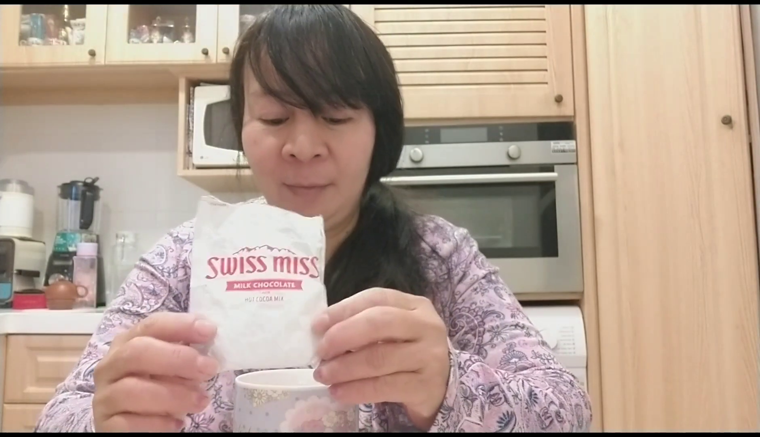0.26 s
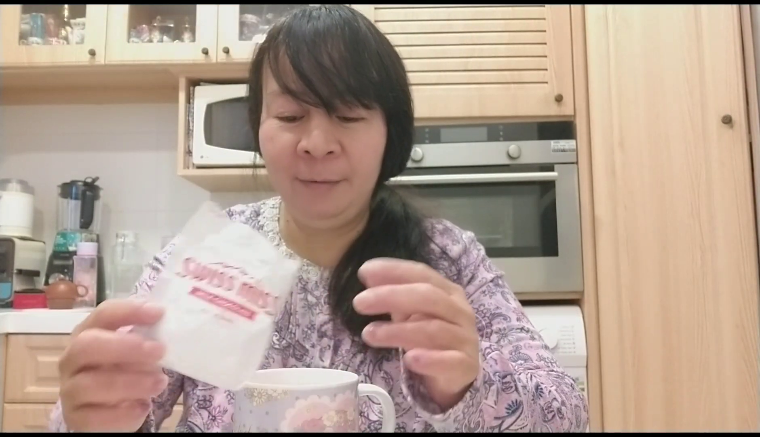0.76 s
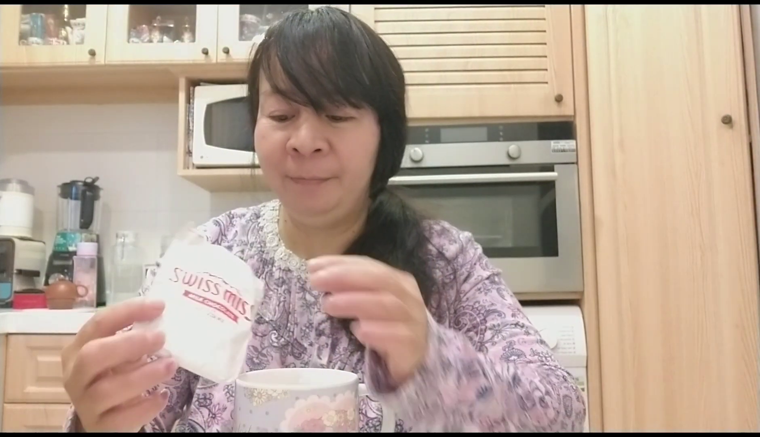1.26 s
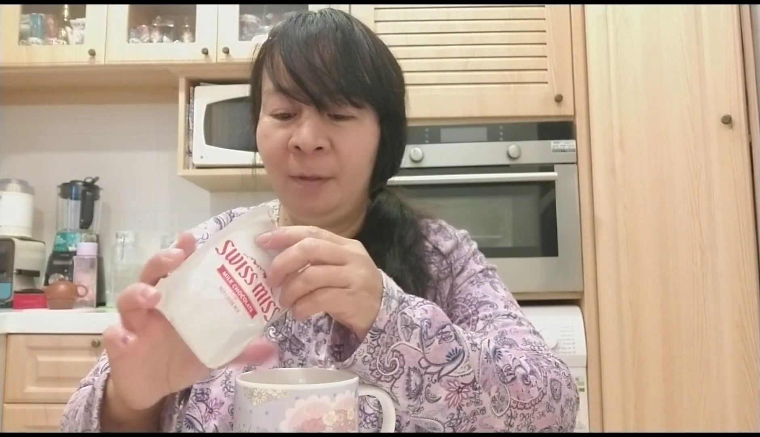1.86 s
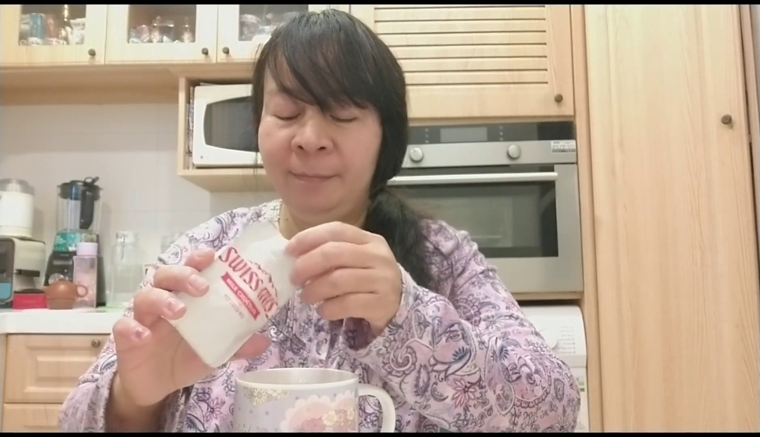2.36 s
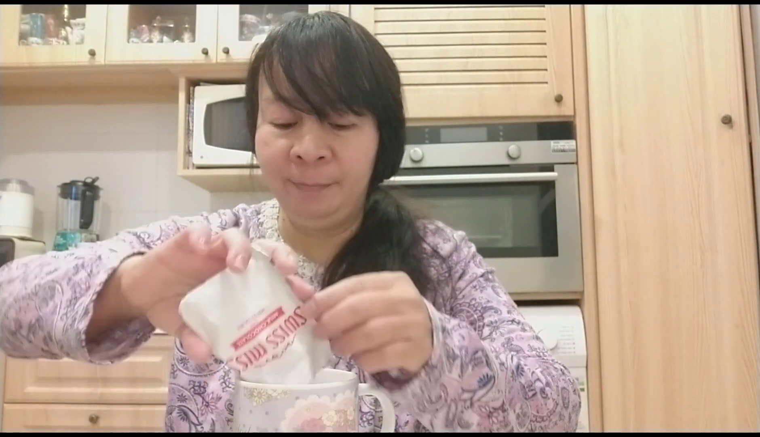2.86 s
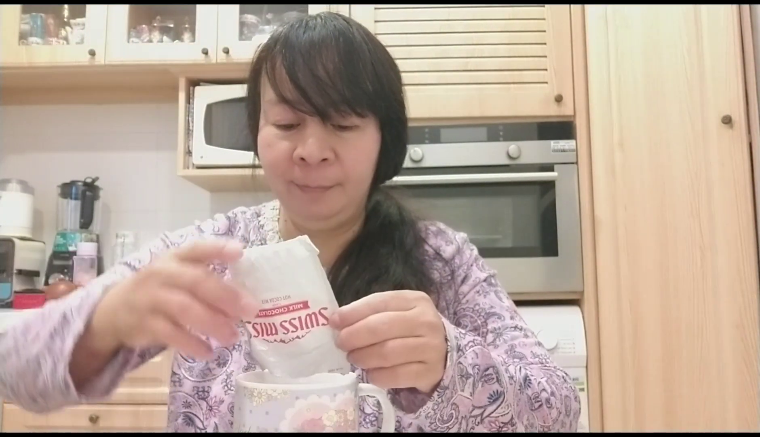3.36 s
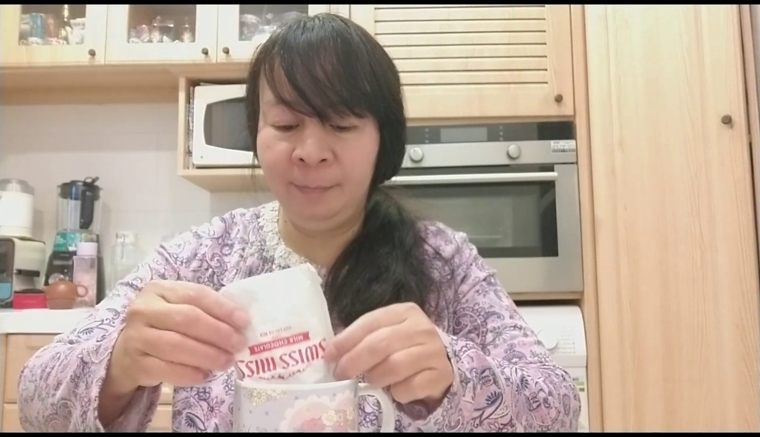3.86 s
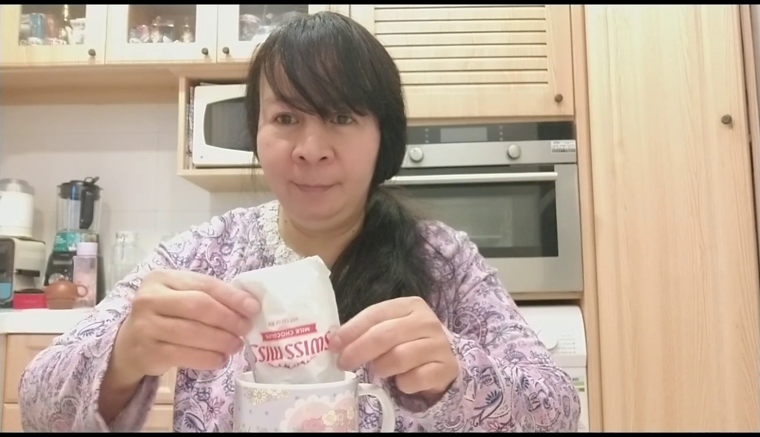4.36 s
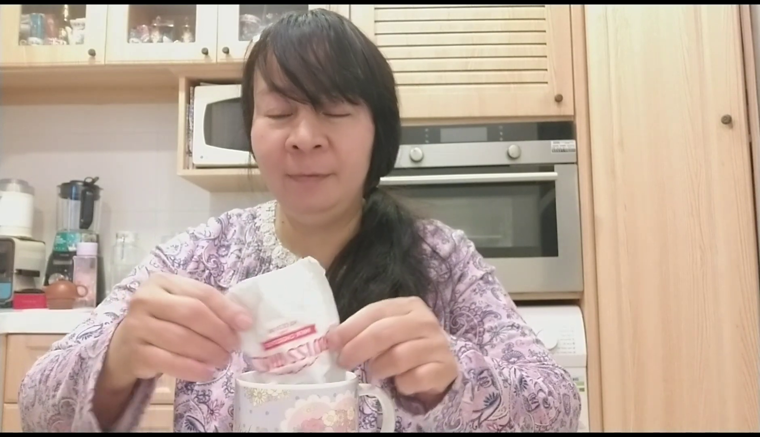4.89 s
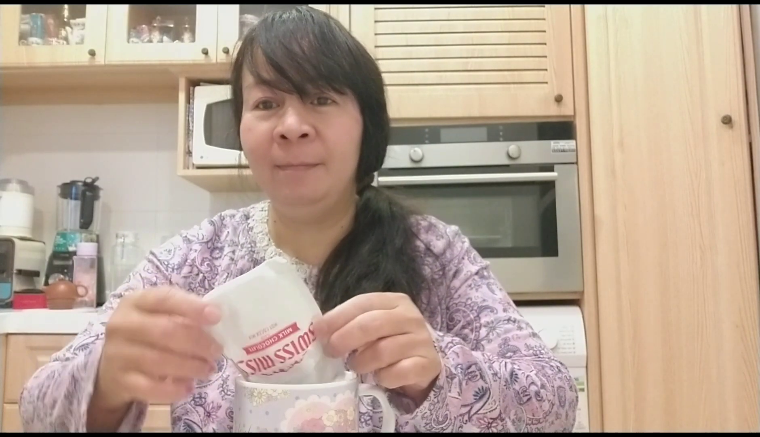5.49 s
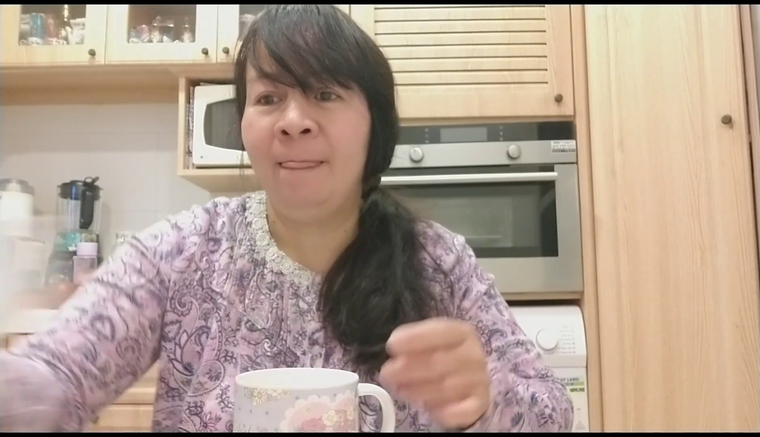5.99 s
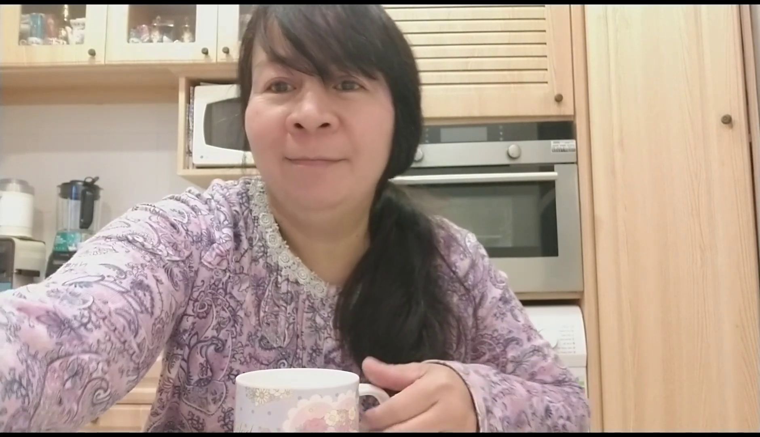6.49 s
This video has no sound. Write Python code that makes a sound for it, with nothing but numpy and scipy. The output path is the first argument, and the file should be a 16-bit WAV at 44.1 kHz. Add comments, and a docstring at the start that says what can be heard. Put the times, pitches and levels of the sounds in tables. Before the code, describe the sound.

A steady, faint appliance whirr and low hum fill a small kitchen, recorded close in stereo. From 0 to 0.7 s fingers rub a taut paper sachet with thin crinkles and tiny snaps. At 0.87 s one abrupt, loud pressure pop hits the left side. After near quiet, soft paper rustles begin around 1.5 s; rougher fibrous rips come at 2.3 s and from 2.75 to 3.1 s, with a few taps. At about 3.45 s crisp cracks begin, and at 3.64 s powder rushes out, fading within fractions of a second. Until 5.6 s irregular finger taps ring short and hollow in the mug, with grainy trickles, dry crease ticks and muted table bumps. A sleeve swishes around 5.8 and 6.1 s, brushing by at 6.3 s. From 6.4 to 6.6 s something hard is knocked down close on the right: a very loud click, then duller bouncing clacks and woody thumps, ending in low rumble.

```python
"""A paper sachet is handled at a kitchen table, torn open and tipped into a mug: shaped noise gives its friction.
The powder slides out in decaying rushes, and finger taps shake out the rest, each ringing a mode of the mug's air.
Early on a puff pops in the left microphone port, as one pressure jump. Near the end a sleeve swishes past in
swells of noise and something is knocked down close to the right port, as impulses with damped modes.
Soft bumps and rumble of the table and steady appliance noise lie underneath."""
import sys
import numpy as np
from scipy import signal
from scipy.fft import rfft, irfft, next_fast_len
from scipy.io import wavfile
from scipy.ndimage import uniform_filter1d, map_coordinates

SR = 44100
rng = np.random.default_rng(int(sys.argv[2]) if len(sys.argv) > 2 else 0)


def unload_audio(sound):
    """Save the sound as a 16-bit wav file, at the path given as the first command line argument."""
    columns = np.transpose(np.atleast_2d(sound))
    # keep every value between -1 and 1, then stretch to whole-number steps
    steps = np.round(np.clip(columns, -1, 1) * 32767)
    wavfile.write(sys.argv[1], SR, steps.astype(np.int16))


N = 297168  # samples
TIME = np.arange(N) / SR  # seconds
AGE = np.arange(SR // 2) / SR  # seconds since a blow

# Levels in the event tables are relative: each source applies its own gains to them.
# Fingers rub the sealed pouch while turning it. Each row: start in seconds, length in seconds, level in dB.
RUBS = [(-0.03, 0.06, -57), (.10, 0.087, -63.5), (.192, .048, -50.5), (.305, 0.1, -53), (.476, 0.03, -48.5),
        (.6, 0.13, -65.5)]
# Pulls that tear the top off and turn the pouch over. Each row: start in seconds, length in seconds, level in dB,
# share of ripping fibres in the power (0-1).
PULLS = [(1.541, 0.024, -66, .05), (1.566, 0.081, -54, 0), (1.68, 0.038, -56.5, 0.08),
         (1.806, 0.12, -64.5, 0), (1.904, 0.1, -58.5, 0), (2.23, 0.14, -73, 0.33),
         (2.329, 0.11, -51.5, 0.6), (2.75, 0.099, -59, 0.46), (2.845, 0.052, -55, 0.15),
         (2.884, 0.031, -47, 0.24), (2.953, 0.031, -47, 0.26), (3.04, 0.058, -49, 0.9),
         (3.213, 0.017, -52.5, 0), (3.33, 0.099, -68, 0)]
# Hollow murmur of the pouch while fingers work it. Each row: start in seconds, length in seconds, level in dB.
HELD = [(1.47, 4.15, -66)]
# Shakes that send powder trickling over the paper. Each row: start in seconds, length in seconds, level in dB.
SHAKES = [(3.402, 0.014, -45), (3.645, 0.036, -41.5), (3.765, 0.064, -56.5), (3.993, 0.027, -48),
          (4.03, 0.053, -52.5), (4.17, 0.14, -69), (4.34, 0.036, -67.5), (4.485, 0.14, -72),
          (4.603, .018, -56), (4.682, .03, -50), (4.852, 0.024, -55), (5.008, 0.1, -53),
          (5.158, 0.037, -49.5), (5.25, .17, -55), (5.495, 0.095, -49)]
# Powder sliding out. Each row: start in seconds, level in dB, t60 in seconds.
SLIDES = [(3.069, -50, 0.24), (3.61, -44, 0.7), (3.642, -30, 0.24), (3.762, -44.5, 0.36)]
# Taps and falling clumps. Each row: time in seconds, level in dB, mug air mode in Hz,
# paper crack in dB relative to that level.
TAPS = [(0.3865, -47, 548, 11), (2.348, -44, 900, 20), (2.851, -38.5, 790, -3), (2.863, -41, 794, 8),
        (2.981, -29.5, 740, 7.5), (3.45, -30, 826, 3.5), (3.609, -33, 860, 10), (3.654, -27, 800, 13),
        (3.771, -27, 780, 3), (3.825, -28, 740, 9), (3.838, -26, 854, 10.5), (3.856, -24, 803, 2.5),
        (3.874, -33, 770, 1), (4.051, -33, 773, -5), (4.136, -35.5, 793, -12), (4.166, -22.5, 837, -4.5),
        (4.254, -32, 717, 2.5), (4.56, -30, 680, -8), (4.61, -20.5, 810, 1), (4.795, -29.5, 764, -6),
        (4.87, -37.5, 770, -3), (5.009, -24.5, 850, 2), (5.09, -24, 773, -2), (5.184, -36, 800, 6),
        (5.249, -28, 770, -2.5), (5.538, -30, 863, -7), (5.617, -40, 860, 1)]
# The pouch empties between these two times, in seconds.
POUR_S = [3.7, 4.7]
# Ring of the mug in dB relative to the tap: pouch full, pouch emptied.
MUG_RING_DB = [7.5, 3]
# Creases snapping. Each row: time in seconds, level in dB.
SNAPS = [(0.0953, -34), (0.3867, -40), (0.5065, -39), (0.646, -47), (1.582, -56), (1.965, -41),
         (2.345, -52), (3.226, -39), (3.4507, -25.5), (3.641, -22), (3.771, -25.5), (3.811, -32.5),
         (3.982, -37.5), (3.9997, -30.5), (4.575, -32.5), (4.6947, -40), (5.0392, -29), (5.1635, -28.5),
         (5.6147, -27.5)]
# Sweeps of the reaching arm. Each row: middle in seconds, half length in seconds, level in dB.
SWEEPS = [(5.81, 0.14, -53.5), (6.12, 0.092, -52.5), (6.34, 0.14, -60)]
# Knocks by the right port. Each row: time in seconds, click in dB, table boom in dB, table knock in dB,
# dullness (0-1).
KNOCKS = [(6.409, -27.5, -52, -39, 0), (6.4359, -4, -31, -25, 0.18), (6.4594, -31, -38, -42, 0.9),
          (6.4885, -10, -31, -40, 0.27), (6.5262, -9.5, -25, -28.5, 0.6), (6.5523, -17.5, -35, -43, 0.73),
          (6.581, -20, -35.5, -38, 0.78)]
# Modes of the table top. Each row: frequency in Hz, mean level in dB, t60 in seconds.
TABLE_MODES = [(257.3, -11.5, 0.18), (356, -10, 0.08), (432, -1, 0.063), (477, -6, 0.085),
               (577, -11, 0.072), (967, 2.5, 0.034)]
# Modes of the hard thing that is knocked. Each row: frequency in Hz, mean level in dB, t60 in seconds.
CLACK_MODES = [(1280, -16, 0.02), (1490, -4, 0.022), (1640, -5, 0.034), (1810, -9, 0.026),
               (2853, 2.5, 0.021), (3230, -10, 0.02), (4140, -2, 0.038)]
# Hands and forearms bumping the table. Each row: time in seconds, level in dB, pitch in Hz.
BUMPS = [(0.385, -40.5, 340), (1.075, -52.5, 128), (1.591, -38.5, 465), (2.306, -45.5, 460),
         (3.452, -39, 128), (3.858, -30, 345), (4.168, -37.5, 400), (4.754, -37, 356), (5.093, -32, 406),
         (5.54, -43.5, 322)]
# The arms press on the table. Each row: middle in seconds, half length in seconds, level in dB.
PRESSES = [(3.95, 0.19, -57), (4.78, 0.24, -61.5), (6.7, 0.53, -70)]
# Hum of the appliances. Each row: frequency in Hz, level in dB.
HUM = [(118.4, -72), (279.9, -74.5), (446.8, -74), (834.4, -82.5)]
# Decay of the kitchen. Each row: frequency in Hz, t60 in seconds.
KITCHEN = [(120, 0.63), (500, 0.37), (1500, 0.33), (5000, 0.37), (14000, 0.27)]

# Relative spectra. Each row: frequency in Hz, level in dB per Hz.
# The sealed, taut pouch; torn paper and the sleeve's brush; ripping fibres; the hollow answer of pouch and mug.
TAUT = [(500, -29), (1500, -12), (2150, -8.5), (2450, 3.5), (2700, -10), (2950, 1), (3250, -8),
        (3500, -1.5), (4200, -8), (6700, -12), (7600, -18.5), (10000, -20), (13000, -18.5), (16000, -25)]
PAPER = [(500, -16), (1100, -14), (1500, -3.5), (1850, -7), (2200, -1.5), (2700, 2), (4200, 4.5),
         (5700, -3), (6700, -1), (7600, -10.5), (10000, -10.5), (13000, -9.5), (16000, -17)]
FIBRES = [(300, -14), (1100, 3), (1500, 0.5), (2500, 0.5), (4000, -10.5), (6700, -14.5), (7600, -17),
          (13000, -15), (16000, -21)]
HOLLOW = [(120, -24), (300, -8.5), (480, -1.5), (620, -4.5), (720, -6), (840, 0), (1020, -9.5),
          (1400, -25.5), (2500, -38.5)]
# Trickling powder and crease ticks; sliding powder; the paper crack of a tap.
POWDER = [(300, -7.5), (1200, 0.5), (1900, -2), (3000, 3), (4300, 1.5), (5500, -3.5), (6700, -4.5),
          (7700, -14.5), (10000, -15.5), (13000, -14.5), (16000, -32)]
RUSH = [(30, -61), (150, 5), (500, 0.5), (820, 14.5), (1200, -16), (1550, 1), (1900, 7.5), (2600, 8),
        (4300, 1.5), (5500, -9), (6700, -4.5), (8000, -16), (12000, -34), (16000, -41.5)]
CRACK = [(60, -46), (300, -15), (1200, -3.5), (1900, -4), (2400, -1.5), (3100, -3), (4000, -6), (5300, -18),
         (6700, -13.5), (7700, -36), (13000, -34), (16000, -22)]
# The sleeve; the click of a knock; the scatter of the wood.
CLOTH = [(150, -6.5), (450, 2.5), (1000, -1.5), (1600, -4), (2900, 1.5), (5000, -3), (6700, -4.5),
         (7600, -11.5), (13000, -11.5), (16000, -12.5)]
CLICK = [(40, -35), (300, 2.5), (750, -4), (1200, -8), (1600, 4), (2000, 1.5), (2400, -4), (3200, -3.5),
         (5000, -2.5), (6600, -9.5), (7600, -13.5), (9000, -8), (12500, -5.5), (16000, -16)]
WOOD = [(30, -40), (130, -2), (220, 6.5), (330, -6), (450, 1.5), (680, -18), (960, 3.5), (1150, -10.5),
        (1700, -5), (3000, -25), (8000, -56)]
# The table under the arms; the whirr of the quiet room.
RUMBLE = [(20, -27), (50, -29), (72, 3.5), (95, -8.5), (140, -12.5), (300, -44.5), (1000, -70)]
QUIET = [(20, -11.5), (48, -39), (70, 6.5), (100, -10), (135, 1), (200, -3), (290, -10), (360, -7),
         (450, -10.5), (600, -12.5), (1050, -15.5), (1600, -26.5), (6500, -33), (15000, -33)]

RUB_ATTACK_S, PULL_ATTACK_S, SHAKE_ATTACK_S = 0.018, 0.013, 0.012
STOP_T60_S, RELEASE_T60_S = 0.055, 0.44  # after a stroke: the direct sound stops, the room carries on
DIRECT_SHARE = 0.33  # of a stroke's power
RUB_BODY_DB, PULL_BODY_DB, SHAKE_AIR_DB = -9.5, -5.5, -5  # the hollow answer, relative to the stroke
STIR_DB, STIR_S = -22.5, 0.016  # air stirred by a tap: level relative to the tap, and how long it is fed
FLAP_DB = 11.5  # the pouch's flap, relative to the tap
RESTING_DB = -67.5  # rumble under the resting arms
TOP_HZ = 15700  # band limit of the recorder


def amp(db):
    """Level: decibels to amplitude gain."""
    return 10 ** (np.asarray(db) / 20)


def unit(x):
    """Normalisation: scale to rms 1."""
    return x / np.sqrt(np.mean(x ** 2) + 1e-20)


def along(points, hz):
    """Interpolation of (Hz, value) points on a logarithmic frequency axis."""
    f, v = np.transpose(points)
    return np.interp(np.log(hz + 1), np.log(f + 1), v)


def colour(x, spectrum):
    """Minimum-phase filtering: folding the cepstrum makes a (Hz, dB) shape causal."""
    n = x.shape[-1]
    m = 2 * next_fast_len(n // 2 + SR // 8)
    log_gain = np.log(amp(along(spectrum, np.fft.rfftfreq(m, 1 / SR))))
    cepstrum = irfft(log_gain, m)
    cepstrum[1:m // 2] *= 2
    cepstrum[m // 2 + 1:] = 0
    response = np.exp(rfft(cepstrum))
    return irfft(rfft(x, m) * response, m)[..., :n]


def wobble(rate):
    """Slow fluctuation: a smooth random curve, rate knots a second."""
    knots = rng.standard_normal(int(N * rate / SR) + 4)
    return map_coordinates(knots, [TIME * rate], order=2)


def fade(t60):
    """Exponential decay: 60 dB down in t60 seconds after a blow."""
    return np.exp(-np.log(1000) * AGE / max(t60, 1e-4))


def ring(hz, t60, attack):
    """Damped resonance: one decaying mode with a soft start."""
    return np.sin(2 * np.pi * hz * AGE) * fade(t60) * (1 - np.exp(-AGE / attack))


def burst(spectrum, t60, sharp=0):
    """Impact noise: an impulse and the scatter after it, coloured and scaled to unit energy."""
    scatter = rng.standard_normal(len(AGE)) * fade(t60)
    impulse = sharp * (AGE == 0)
    x = colour(scatter / np.linalg.norm(scatter) + impulse, spectrum)
    return x / np.linalg.norm(x)


def texture(spectrum, rate, grain_db, spread, flex_db=1):
    """Friction: tiny slips in a blur of finer ones, with shifting resonances, in stereo at rms 1."""
    slips = (rng.random(N) < rate / SR) * rng.standard_normal(N)
    mid = rng.standard_normal(N) + amp(grain_db) * unit(slips)
    side = spread * rng.standard_normal(N)
    z = signal.stft(np.array([mid + side, mid - side]), nperseg=512)[2]
    # the resonances drift over frequency and time as the surface flexes
    field = uniform_filter1d(rng.standard_normal(z.shape[1:]), size=3, axis=0)
    field = uniform_filter1d(field, size=12, axis=1)
    flexed = signal.istft(z * amp(flex_db * unit(field)), nperseg=512)[1][:, :N]
    return unit(colour(flexed, spectrum))


def strokes(rows, attack):
    """Envelope of friction: each stroke rises, holds, stops and lingers in the room; powers add."""
    power, direct = np.zeros(N), np.clip(DIRECT_SHARE, 0, 1)
    for s, length, db in rows:
        rise = np.clip((TIME - s) / attack, 0, 1)
        after = 2 * np.log(1000) * np.maximum(TIME - s - length, 0)  # doubled, as this is power
        stop = direct * np.exp(-after / STOP_T60_S)
        linger = (1 - direct) * np.exp(-after / RELEASE_T60_S)
        power += (amp(db) * rise) ** 2 * (stop + linger)
    return np.sqrt(power)


def swells(rows):
    """Envelope of slow arm movements: each gathers speed and slows again in a bell; powers add."""
    return np.sqrt(sum(amp(db) ** 2 * np.exp(-((TIME - s) / half) ** 2) for s, half, db in rows))


def pan(right_db):
    """Level difference between the two ports: gains with the right one right_db higher."""
    return amp([[-right_db / 2], [right_db / 2]])


def ports(x, right_db, lag):
    """Time and level difference: a mono sound reaches the left port lag seconds later."""
    left = np.interp(AGE - lag, AGE, x, left=0)
    return np.array([left, x]) * pan(right_db)


def room(x, wet_db):
    """Reverberation: a blow convolved with decaying noise, different at each port."""
    hz, t, z = signal.stft(rng.standard_normal((2, len(AGE))), SR, nperseg=256)
    decay = np.exp(-np.log(1000) * t / along(KITCHEN, hz)[:, None])
    tail = signal.istft(z * decay, SR, nperseg=256)[1]
    tail = tail[:, :len(AGE)] * (1 - np.exp(-AGE / 0.0021))
    tail = tail / np.linalg.norm(tail[0])
    return amp(wet_db) * signal.fftconvolve(x[None], tail, axes=1)[:, :len(AGE)]


def add(out, s, x):
    """Superposition: mix a sound in at time s."""
    i = round(s * SR)
    out[:, i:i + x.shape[-1]] += x[..., :N - i]


def handling():
    """Friction and tearing: fingers rub the taut pouch, then rip it in pulls; its hollow body answers."""
    rub = strokes(RUBS, RUB_ATTACK_S)
    pull_rows = [(s, length, db) for s, length, db, share in PULLS]
    rip_rows = [(s, length, db + 10 * np.log10(np.clip(share, 1e-3, 1))) for s, length, db, share in PULLS]
    pull = strokes(pull_rows, PULL_ATTACK_S)
    rip = strokes(rip_rows, PULL_ATTACK_S)
    rustle = np.sqrt(np.abs(pull ** 2 - rip ** 2))  # the power that is not ripping
    rubbing = rub * texture(TAUT, rate=240, grain_db=-13.0, spread=0.84, flex_db=4.0)
    tearing = rustle * texture(PAPER, rate=260, grain_db=-10, spread=0.89, flex_db=3.0)
    ripping = rip * texture(FIBRES, rate=300, grain_db=-6, spread=1.0, flex_db=4)
    answer = rub * amp(RUB_BODY_DB) + pull * amp(PULL_BODY_DB)
    body = np.hypot(answer, strokes(HELD, PULL_ATTACK_S))
    pouch = body * texture(HOLLOW, rate=170, grain_db=-9, spread=0.73, flex_db=6.5)
    grip = amp(0.37 * wobble(54))
    return grip * (rubbing * pan(0.32) + (tearing + ripping) * pan(1.6) + pouch * pan(5.3))


def shaking():
    """Granular friction: powder trickles over the paper; shakes and taps stir the air in the mug."""
    trickle = strokes(SHAKES, SHAKE_ATTACK_S)
    stir = strokes([(s, STIR_S, db + STIR_DB) for s, db, *_ in TAPS], STIR_S)
    grains = trickle * texture(POWDER, rate=280, grain_db=-7.5, spread=1.0, flex_db=4.0)
    air = np.hypot(trickle * amp(SHAKE_AIR_DB), stir)
    mug = air * texture(HOLLOW, rate=120, grain_db=-7.5, spread=0.7, flex_db=5.5)
    return amp(0.29 * wobble(60)) * (grains + mug) * pan(1.7)


def slides():
    """Granular avalanche: masses of powder break loose at once and thin out, landing in clumps."""
    flow = np.zeros((1, N))
    for s, db, t60 in SLIDES:
        front = amp(8.5) * fade(0.0046)  # the front of the mass lands hardest
        add(flow, s, amp(db) * (fade(t60) + front))
    clumps = amp(1.1 * wobble(190))
    return flow * clumps * texture(RUSH, rate=1400, grain_db=-13, spread=0.7, flex_db=2.0) * pan(2.1)


def taps():
    """Cavity resonance: a tap flaps and cracks the pouch and rings the half-covered mug, less once it is empty."""
    out = np.zeros((2, N))
    for s, db, mug_hz, crack_db in TAPS:
        flap = amp(FLAP_DB) * ring(610 * amp(rng.normal(0, 0.8)), t60=.011, attack=0.0027)
        air = amp(np.interp(s, POUR_S, MUG_RING_DB)) * ring(mug_hz, t60=0.025, attack=0.0021)
        knock = amp(db) * (flap + air)
        crack = amp(db + crack_db) * burst(CRACK, t60=0.013, sharp=0.16)
        direct = ports(knock, right_db=3.5, lag=.00005)
        direct = direct + ports(crack, right_db=1.0, lag=rng.normal(0, .00006))
        add(out, s + 0.000961, direct + room(knock, wet_db=-8.5) + room(crack, wet_db=2.0))
        add(out, s + rng.uniform(.016, .022), amp(-16.5) * direct)  # a nearby surface echoes the tap
    return out


def snaps():
    """Snap-through buckling: creases flip over with a dry tick that the room spreads out."""
    out = np.zeros((2, N))
    for s, db in SNAPS:
        tick = amp(db + 7.0) * burst(POWDER, t60=0.0086, sharp=0.42)
        direct = ports(tick, right_db=-1.0, lag=rng.normal(0, .00006))
        add(out, s + 0.000962, direct + room(tick, wet_db=-1))
    return out


def knocks():
    """Impact: a soft bump, then a hard click and its bounces excite the modes of object and table."""
    out = np.zeros((2, N))
    add(out, 6.4095, -amp(-16.0) * ring(109, t60=0.048, attack=0.0021) * amp([[-15], [0]]))
    for s, click_db, boom_db, knock_db, dullness in KNOCKS:
        modes = sum(amp(level + rng.normal(0, 1.8)) * ring(hz, t60, attack=0.0011)
                    for hz, level, t60 in TABLE_MODES)
        wood = amp(4.5) * modes + amp(24.5) * burst(WOOD, t60=0.052, sharp=0.24)
        shell = sum(amp(level + rng.normal(0, 1.5)) * ring(hz, t60, attack=.0001) * rng.choice([-1, 1])
                    for hz, level, t60 in CLACK_MODES)
        boom = ring(152 * amp(rng.normal(0, 0.34)), t60=0.19, attack=0.0033)
        click = amp(click_db) * (amp(13.0) * burst(CLICK, t60=0.011, sharp=0.41) + amp(-16) * shell)
        dull = np.clip(dullness, 0, .9)  # softer contacts lose their treble
        click = signal.lfilter([1 - dull], [1, -dull], click)
        thud = amp(knock_db) * wood + amp(boom_db + 0.5) * boom
        direct = amp(-7.0) * ports(click + thud, right_db=17, lag=0.00058)
        add(out, s + 0.0008, direct + room(click, wet_db=-11.0) + room(thud, wet_db=-16.0))
    return out


def port_pop():
    """Pressure pulse: a puff at the left port builds, jumps, and swings back below rest."""
    u = AGE / 0.0027
    jump = (1 - u) * np.exp(-(u / 1.65) ** 1.87) * (1 - np.exp(-AGE / .00005))
    lead = amp(-50) * np.exp(-AGE[::-1] / 0.0024)
    pulse = np.concatenate([lead, amp(-2.0) * jump])
    out = np.zeros((2, N))
    add(out, .872 - len(AGE) / SR, pulse * amp([[0], [-52]]))  # the jump falls at 0.872 s
    return out


def sleeve():
    """Sliding friction: cloth moves along the table and brushes past the right port."""
    slide = swells(SWEEPS) * texture(CLOTH, rate=2400, grain_db=-5.0, spread=1.0)
    pass_by = amp(-45.0) * np.exp(-((TIME - 6.331) / 0.01) ** 2)
    brush = pass_by * texture(PAPER, rate=520, grain_db=-25, spread=0.63)
    return slide * pan(2.4) + brush * amp([[-16], [0]])


def arms():
    """Structure-borne sound: soft bumps on the table, and its low rumble under the leaning arms."""
    weight = np.hypot(amp(RESTING_DB), swells(PRESSES))
    out = weight * texture(RUMBLE, rate=140, grain_db=-8, spread=0.13) * pan(0.73)
    for s, db, hz in BUMPS:
        bump = amp(db + 5.5) * ring(hz, t60=9 / hz, attack=0.0009)  # 60 dB down in nine cycles
        add(out, s, bump * pan(3.7) + room(bump, wet_db=-8.5))
    return out


def kitchen_air():
    """Steady background: broadband whirr and wavering tones of the appliances."""
    whirr = amp(-64.5 + 0.45 * wobble(2.1)) * texture(QUIET, rate=1600, grain_db=-36, spread=0.58)
    hum = sum(amp(db + 1.5) * np.sin(2 * np.pi * hz * TIME + .5 * wobble(3.4)) for hz, db in HUM)
    return (whirr + hum) * pan(3.6)


def scene():
    """Superposition of the sachet, the other events at the table and the room tone."""
    sachet = handling() + shaking() + slides() + taps() + snaps()
    return sachet + knocks() + port_pop() + sleeve() + arms() + kitchen_air()


def record(dry):
    """Saturation and band limiting: the recorder rounds off peaks near 0.8, then low-passes steeply."""
    rounded = dry / (1 + np.abs(dry / .8) ** 10) ** (1 / 10)
    low_pass = signal.ellip(10, .1, 90, TOP_HZ, fs=SR, output="sos")
    return signal.sosfilt(low_pass, rounded)


dry = scene()
out = record(dry)
unload_audio(out)
```